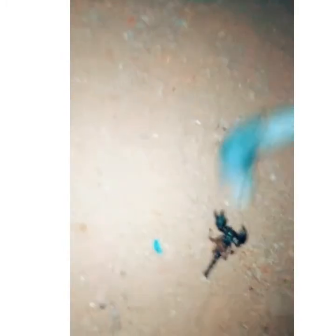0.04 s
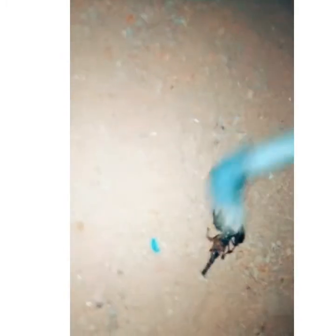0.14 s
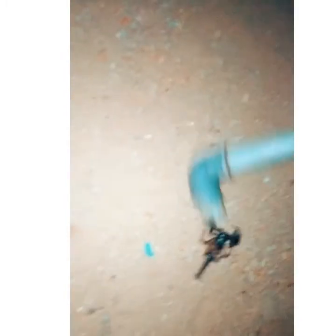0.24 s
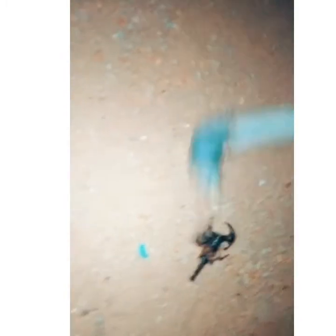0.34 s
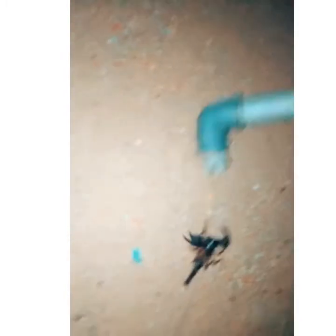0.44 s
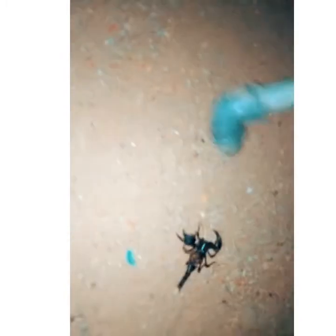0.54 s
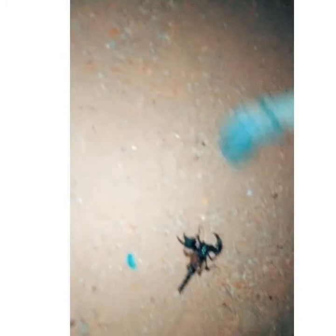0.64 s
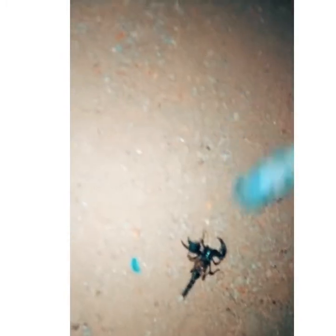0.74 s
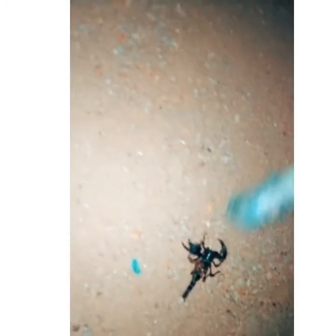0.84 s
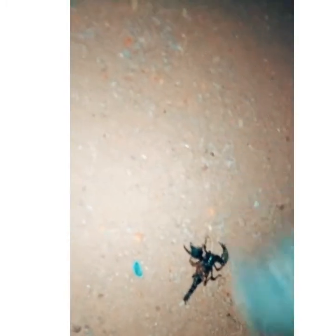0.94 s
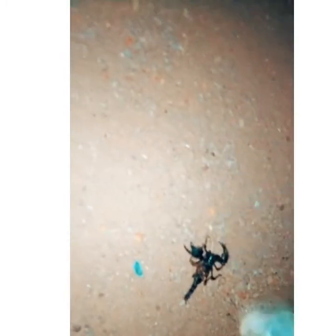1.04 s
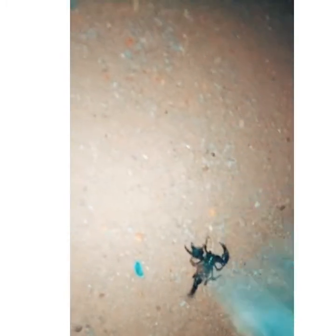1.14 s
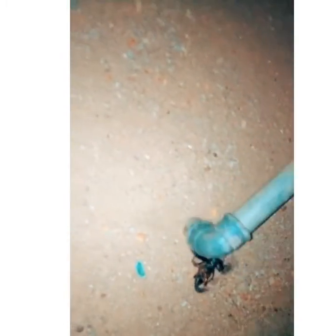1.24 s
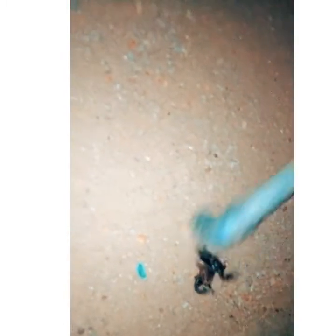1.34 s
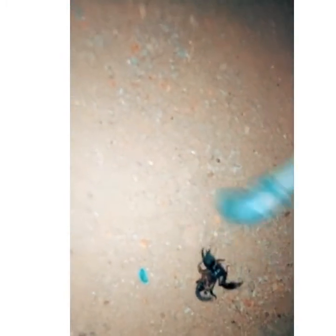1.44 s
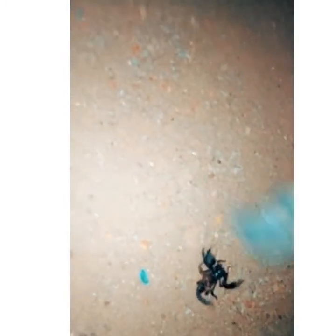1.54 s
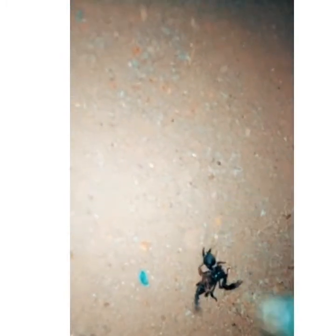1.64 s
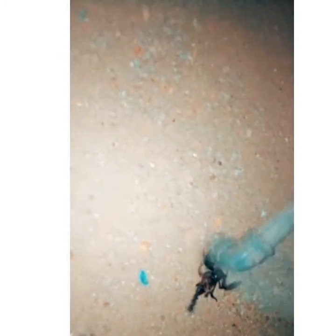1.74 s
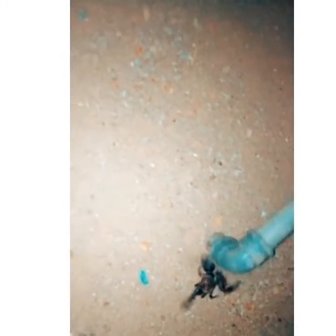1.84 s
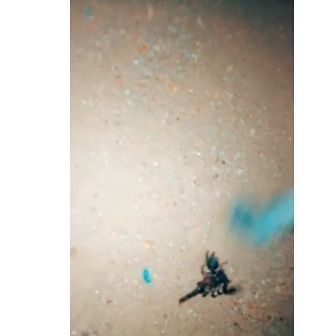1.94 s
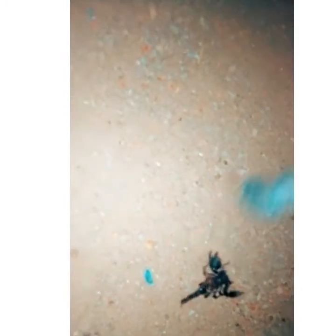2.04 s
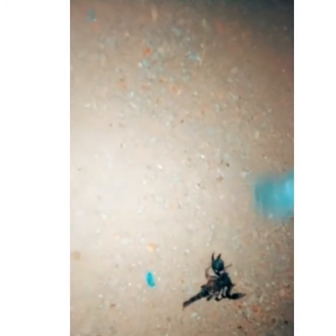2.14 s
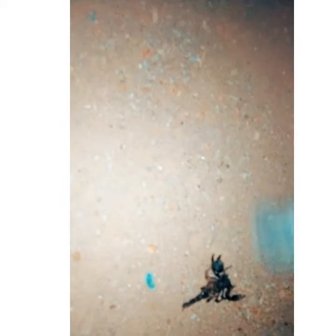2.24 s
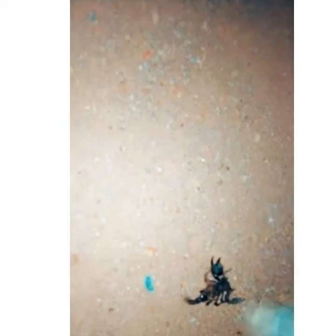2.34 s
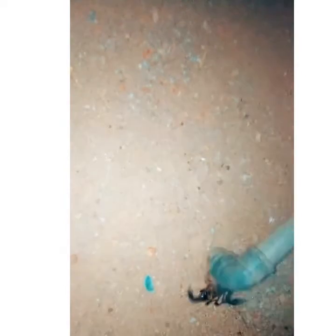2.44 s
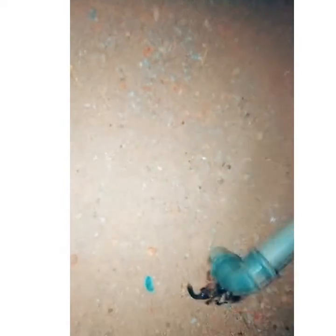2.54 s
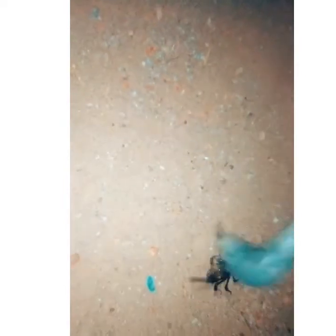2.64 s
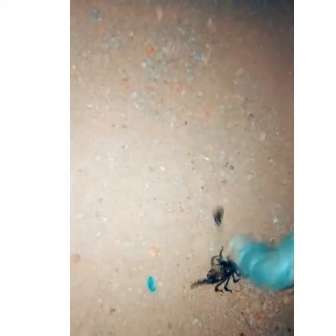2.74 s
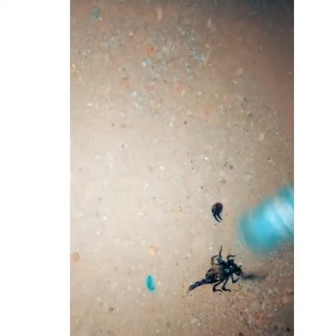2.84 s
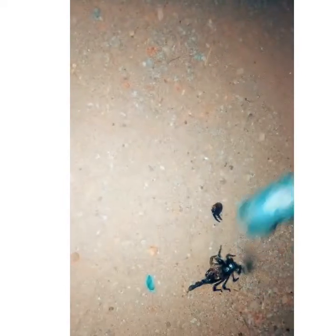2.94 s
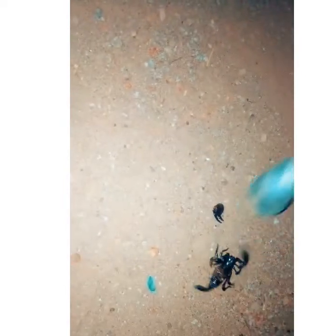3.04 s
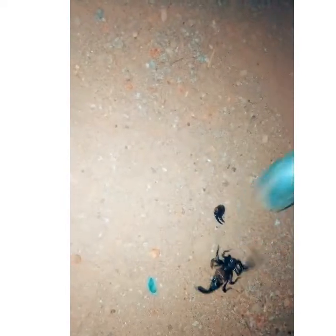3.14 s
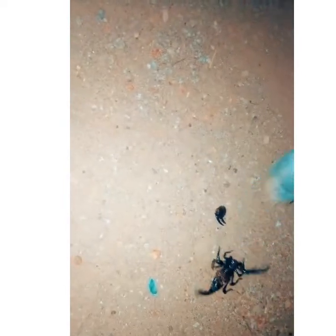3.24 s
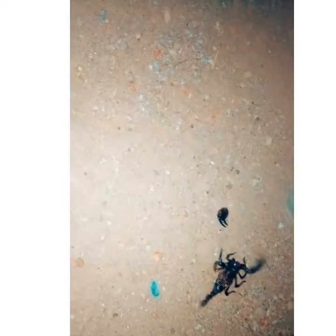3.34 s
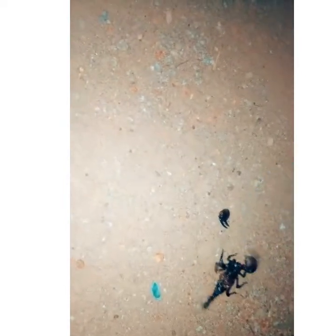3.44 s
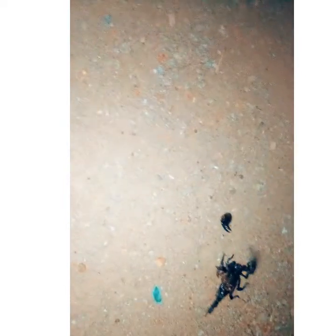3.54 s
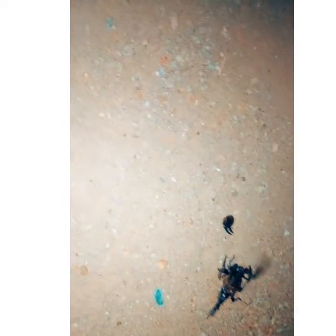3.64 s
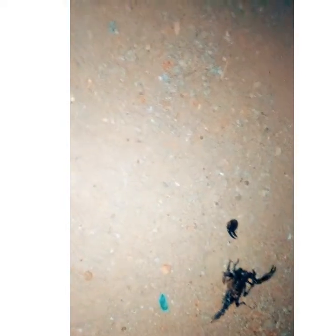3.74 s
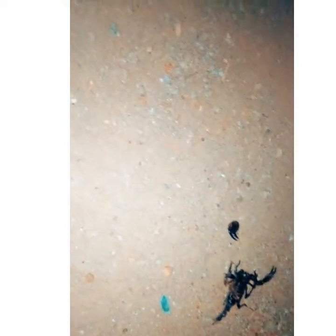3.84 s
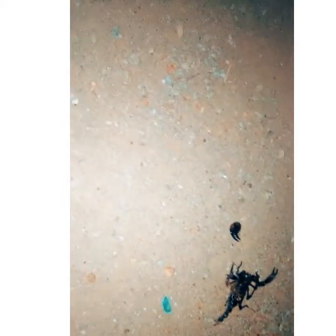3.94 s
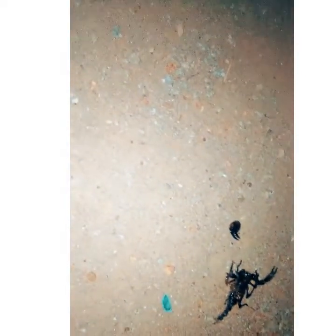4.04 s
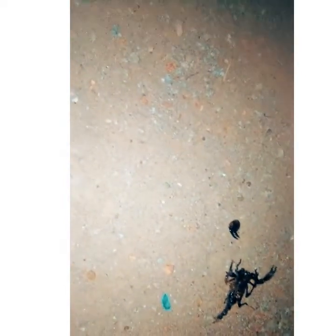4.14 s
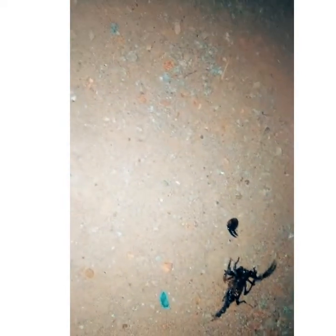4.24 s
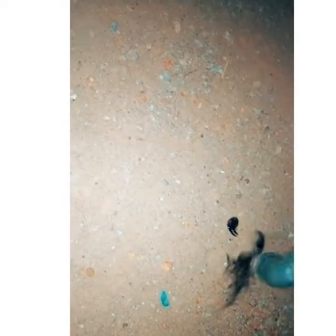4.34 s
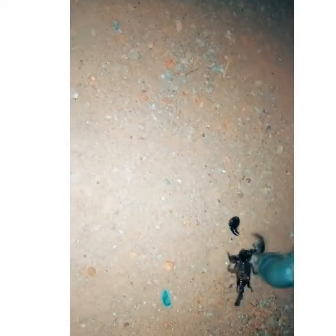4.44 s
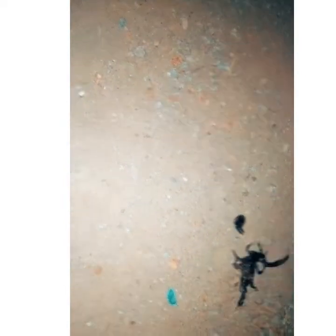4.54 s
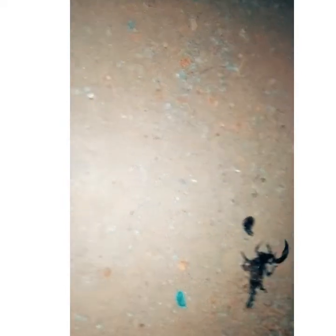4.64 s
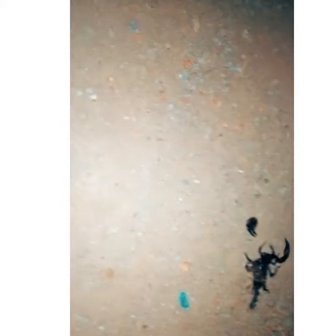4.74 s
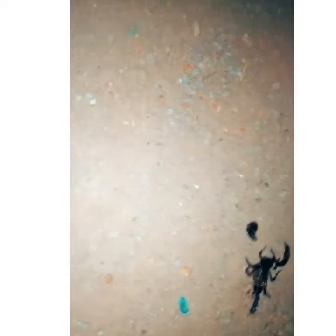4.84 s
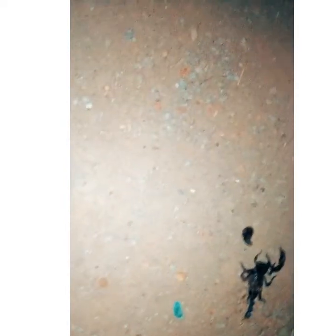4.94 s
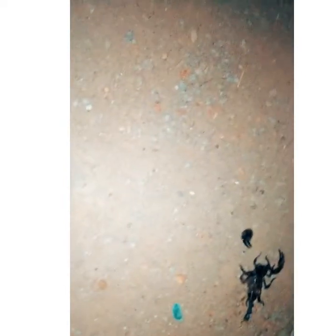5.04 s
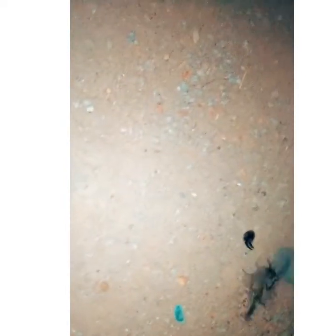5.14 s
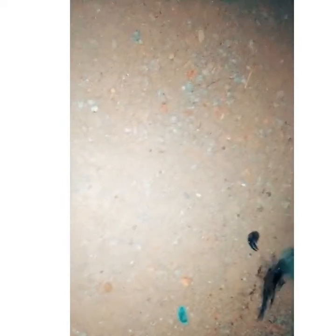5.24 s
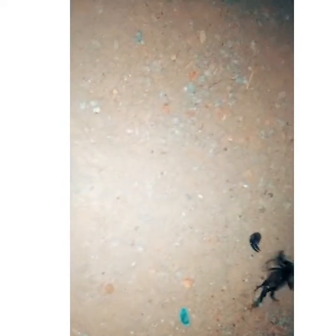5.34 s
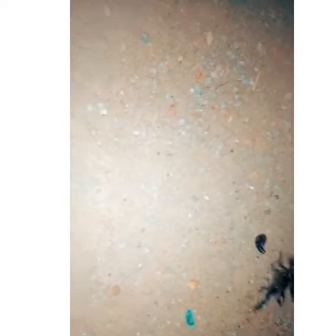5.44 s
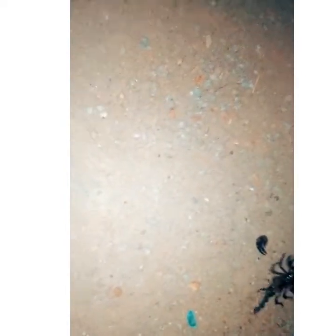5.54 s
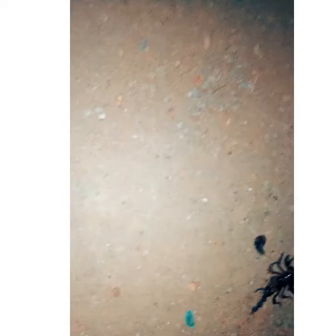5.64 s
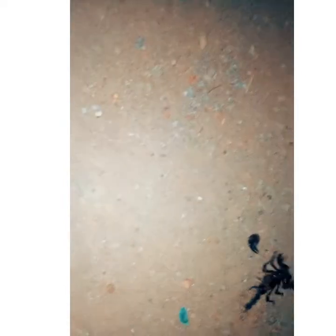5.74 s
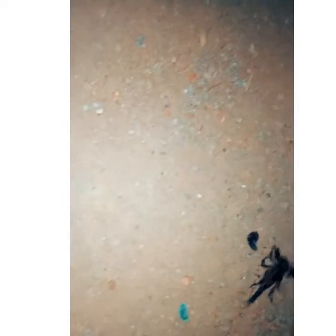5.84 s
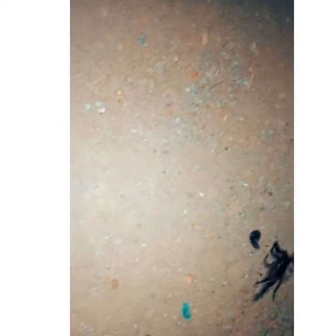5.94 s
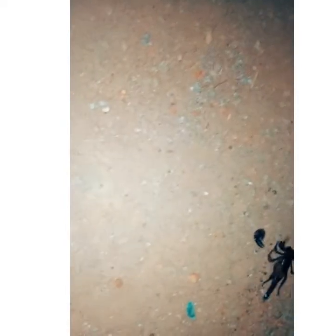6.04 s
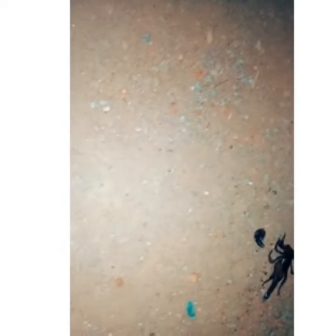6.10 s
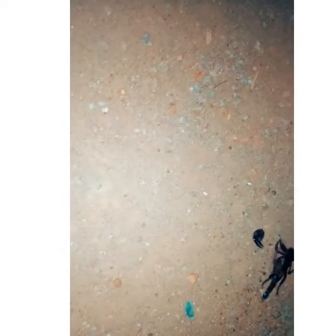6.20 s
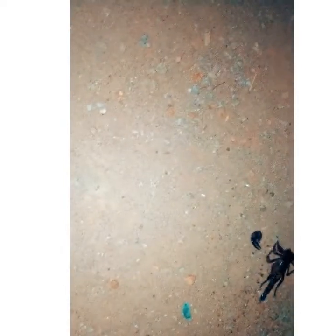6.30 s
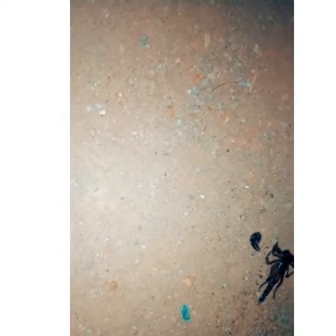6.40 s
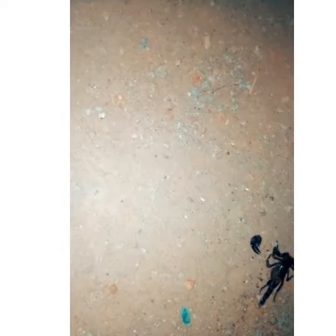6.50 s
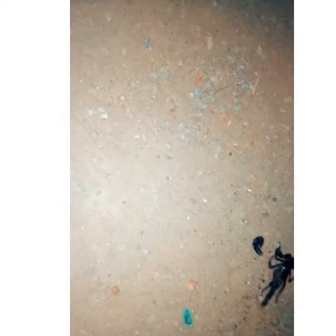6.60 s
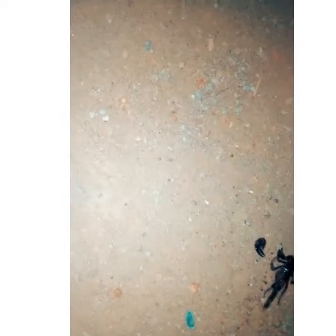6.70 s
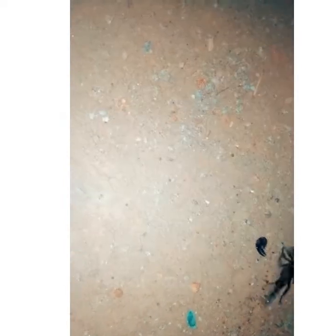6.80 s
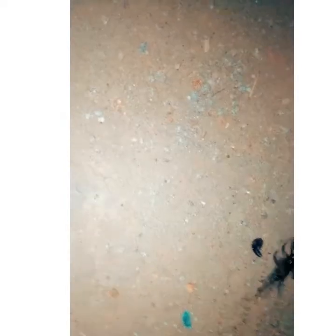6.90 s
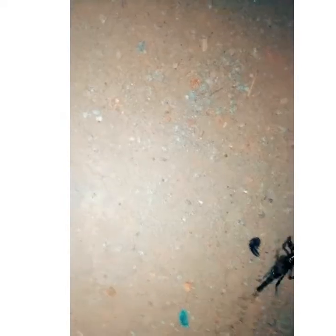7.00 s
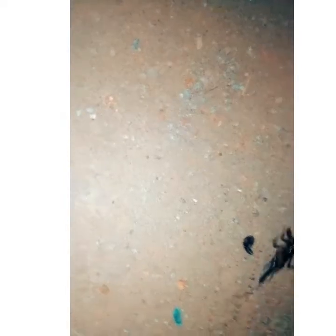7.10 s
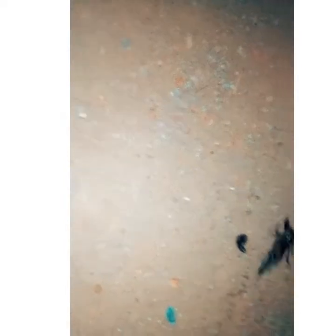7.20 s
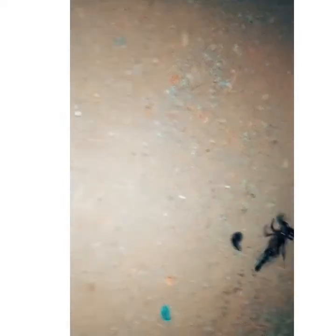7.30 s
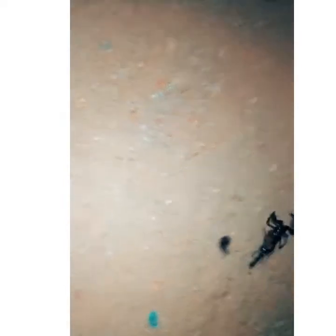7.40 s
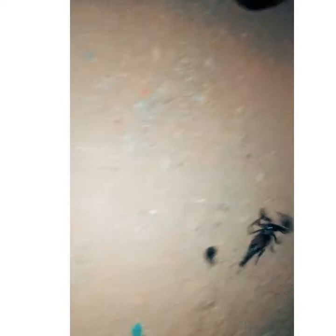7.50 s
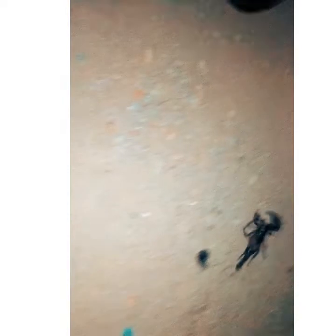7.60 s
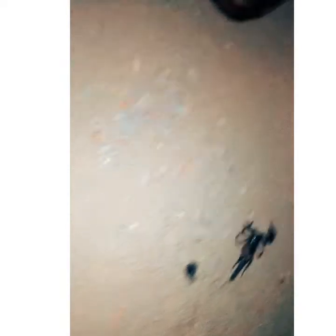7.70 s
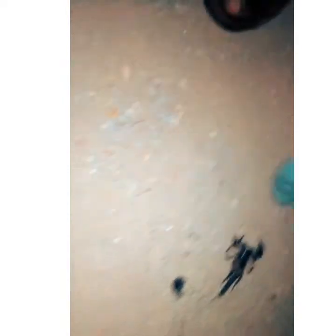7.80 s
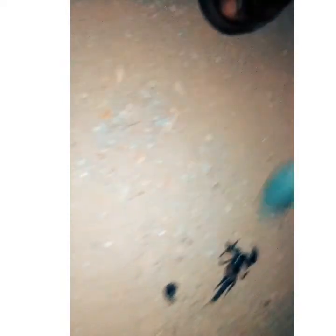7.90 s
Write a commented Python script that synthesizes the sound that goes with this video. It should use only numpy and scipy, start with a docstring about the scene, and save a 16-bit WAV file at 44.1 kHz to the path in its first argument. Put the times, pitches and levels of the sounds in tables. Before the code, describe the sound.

A plastic pipe strikes gritty ground in sharp, hollow knocks at irregular intervals, with faint crickets in the night air.

```python
"""Beating a scorpion at night

A plastic pipe with an elbow is beaten on a scorpion on hard, gritty ground. Each blow crunches
through grit, thuds and rings the air in the pipe. The elbow taps and skids, pebbles land, and
nearby walls echo. Crickets trill and chirp in the distance over the low rumble of the night air.
The hardest blows overload the microphone."""
import sys
import numpy as np
from scipy import signal
from scipy.fft import rfft, irfft, next_fast_len
from scipy.io import wavfile
from scipy.ndimage import uniform_filter1d, map_coordinates

SR = 44100
rng = np.random.default_rng(int(sys.argv[2]) if len(sys.argv) > 2 else 0)


def unload_wav(signal):
    """Save mono or channel-first audio to the path in sys.argv[1] as 16-bit WAV at rate SR, clipped to [-1, 1]."""
    wavfile.write(
        sys.argv[1],
        SR,
        np.round(np.clip(np.atleast_2d(signal).T, -1, 1) * 32767).astype(np.int16),
    )


N = 350991

# Tone of the night air and hiss: pitch_hz, gain_db (a gain is a relative level)
NIGHT_TONE = [(20, -22.5), (45, -10), (80, 0), (160, -3), (300, -9), (1000, -15.5), (3000, -20),
              (7000, -21.5), (7900, -32.5), (13800, -34), (15000, -27), (15500, -19.5), (15900, -47)]
# Far trilling insects: pitch_hz, width_hz, level_db, swell_db
TRILLS = [(2510, 150, -85, 2), (4250, 300, -82.5, 3), (5740, 240, -72, 2), (5990, 260, -64, 1.44),
          (6584, 560, -72, 2), (7120, 320, -78.5, 3)]
# The nearer cricket's loud calls: middle_s, level_db
LOUD_CHIRPS = [(1.67, -64), (2.0, -63.5), (2.275, -58), (2.885, -57.5), (4.31, -61.5), (4.63, -60),
               (6.53, -63.5), (6.88, -60), (7.26, -61.5)]

# Echoes off the ground and near wall: pitch_hz, fade_s (the time to die away by 60 dB)
NEAR_FADES = [(100, 0.11), (400, 0.075), (1500, 0.092), (6000, .1), (12000, 0.03)]
# Their tone: pitch_hz, gain_db
NEAR_TONE = [(100, 1), (400, 5), (900, 0), (2000, 4.5), (6000, 0), (12000, 11)]
# Echoes from the yard: pitch_hz, fade_s
YARD_FADES = [(100, .55), (280, .28), (420, .55), (650, .28), (1500, 0.23), (6000, .38), (12000, 0.14)]
# Their tone: pitch_hz, gain_db
YARD_TONE = [(100, 4.5), (250, -4.5), (420, -2), (700, 2.5), (2500, 1), (6000, -4.5), (12000, 2)]

# Tone of a pebble's tick: pitch_hz, gain_db
PEBBLE_TONE = [(300, -50), (1500, -30), (2500, -11), (3500, -12), (5000, -1), (6400, 9.5), (7300, -9),
               (9000, -42), (16000, -53)]
# Loose sand under a light touch: pitch_hz, gain_db
SAND_TONE = [(200, -45), (900, -7), (1400, -6.5), (2000, -14), (2600, -7), (3700, -6), (4800, 0),
             (5500, 1.5), (6400, 6), (7300, -8.5), (8500, -20), (10000, -31.5), (15000, -40),
             (16500, -50.5)]
# A full blow's gritty crack, with the high fizz of an overloaded microphone: pitch_hz, gain_db
CRACK_TONE = [(40, -40), (150, -25), (600, -7.5), (1400, -2.5), (2000, -10), (2500, -6.5), (3200, -2.5),
              (3900, -3), (4700, 0.5), (5400, -0.5), (6300, 8), (7200, -7.5), (8500, -16.5), (13000, -32),
              (15200, -21), (16500, -32)]
# The pipe knocking on the ground: pitch_hz, gain_db, fade_s
PIPE_NOTES = [(236, -12.5, .04), (317.2, -3.5, 0.03), (407, -1.5, 0.023), (760, -14, 0.011),
              (886, -13.5, 0.048), (1277.5, -9.5, .03), (1433.5, -13.5, 0.022), (1830, -18.5, 0.029),
              (2220, -24, 0.043)]
# The elbow's rim: pitch_hz, gain_db, fade_s
RIM_NOTES = [(1820, -7.5, .02), (2276, -1, 0.03), (2596, 7.5, 0.019), (3070, -5, 0.023)]
# The elbow landing on its side: pitch_hz, gain_db, fade_s
SIDE_NOTES = [(547.4, -10.5, 0.058), (685, -0.5, 0.032)]
# The dull thump of packed earth: pitch_hz, gain_db, fade_s
EARTH_NOTES = [(83.5, -29.5, 0.31), (122, -17.5, 0.04)]
# The air in the pipe, lowest note first: gain_db, fade_s
AIR_NOTES = [(-1, .19), (0.5, 0.14), (-7, 0.048), (-15.5, 0.064)]

# Flung pebbles land: start_s, level_db
PEBBLE_LANDINGS = [(0.029, -44.5), (1.336, -31), (1.9363, -19.5), (2.7, -46)]
# The elbow drags over grit: start_s, length_s, level_db
SKIDS = [(.22, 0.064, -46), (1.283, 0.056, -46.5), (1.854, 0.046, -41.5), (2.554, 0.066, -47.5),
         (4.43, 0.055, -48), (5.236, .03, -37.5), (6.784, 0.0179, -38.5)]
# Light taps and bounces: start_s, click_db, thud_db, rim_db
TAPS = [(0.203, -30.5, -72, -31), (.246, -41, -67, -42.5), (.29, -33, -72, -38.5),
        (1.247, -29.5, -59.5, -47), (1.323, -29, -30.5, -48), (1.8553, -42, -29.5, -56),
        (2.574, -29, -46, -72), (4.443, -24.5, -51, -60), (4.463, -25.5, -40, -45), (5.239, -31, -19, -48),
        (5.311, -38.5, -56.5, -51), (6.776, -36, -58.5, -48.5), (6.799, -42, -50, -38)]
# Blows, each touching the grit lead_s before it lands:
# start_s, lead_s, thud_db, tilt_db_per_octave, side_db, crack_db, earth_db, air_hz, air_db
BLOWS = [(1.1906, .0025, -3.5, -1.5, -24, -11, -26, 461.6, -23),
         (1.7641, .0031, -8, -2, -23, -9.5, -11, 426, -26),
         (2.454, .0026, -15, -1, -18.5, -6.5, -10, 423, -34),
         (4.3602, .0075, -5.5, 1.5, -21, -9, -8, 416.3, -38),
         (5.1644, .0046, 0, 1.37, -10.5, -8, -10, 420, -28),
         (6.797, .008, -35, 15, -37, -27, -31, 466.4, -40)]

T = np.arange(SR // 2) / SR  # half a second of time for one short sound


def amp(db):
    """Turn decibels into a multiplier."""
    return 10 ** (np.asarray(db) / 20)


def unit(x):
    """Scale a sound to an average power of 1."""
    return x / np.sqrt(np.mean(x ** 2) + 1e-20)


def along(points, hz):
    """Read between the rows of a (pitch, value) table."""
    pitches, values = np.transpose(points)
    return np.interp(np.log(hz + 1), np.log(pitches), values)


def fade(fade_s, t=T):
    """Start at t = 0 and die away by 60 dB in fade_s."""
    return (t >= 0) * amp(-60 * np.abs(t) / max(fade_s, .002))


def rise(rise_s):
    """Climb smoothly from 0 to 1."""
    return 1 - np.exp(-T / rise_s)


def add(track, start_s, x):
    """Mix a sound into the track."""
    part = track[max(round(start_s * SR), 0):][:len(x)]
    part += x[:len(part)]


def wobble(rate_hz):
    """A smooth curve through rate_hz random points a second."""
    points = rng.standard_normal(int(N * rate_hz / SR) + 4)
    return map_coordinates(points, [np.arange(N) * rate_hz / SR])


def filtered(x, gain_at):
    """Turn each pitch up or down by gain_at(hz)."""
    size = next_fast_len(N + SR // 2)
    return irfft(rfft(x, size) * gain_at(np.fft.rfftfreq(size, 1 / SR)), size)[:N]


def band(hz, width_hz):
    """A narrow hiss around one pitch."""
    return unit(filtered(rng.standard_normal(N), lambda f: np.exp(-2 * ((f - hz) / width_hz) ** 2)))


def night(level_db=-64.5):
    """The night air rumbles steadily over a faint hiss."""
    return amp(level_db) * unit(filtered(rng.standard_normal(N), lambda hz: amp(along(NIGHT_TONE, hz))))


def far_insects(flutter_db=.15, pulse_db=-88.5, first_pulse_s=.06, pulse_every_s=.187):
    """Many far insects blur into a fluttering trill, and a high one pulses above them."""
    trill = sum(amp(db + swell_db * wobble(12) + flutter_db * wobble(76)) * band(hz, width_hz)
                for hz, width_hz, db, swell_db in TRILLS)
    pulses = np.cos(np.pi * (np.arange(N) / SR - first_pulse_s) / pulse_every_s) ** 2
    return trill + amp(pulse_db) * pulses * band(8600, width_hz=800)


def cricket(pitch_hz=4237, scatter_hz=32, waver_hz=30, first_s=1.37, every_s=.323,
            soft_db=-68.5, half_chirp_s=.03, stroke_db=2.5, echo_db=-2):
    """A nearer cricket chirps with uneven wing strokes; a loud call replaces a soft one."""
    beats = np.arange(first_s, N / SR, every_s)
    levels = soft_db + 2 * rng.standard_normal(len(beats))
    soft_chirps = [(s, db) for s, db in zip(beats, levels)
                   if all(abs(s - loud_s) > every_s / 2 for loud_s, _ in LOUD_CHIRPS)]
    chirps = np.zeros(N)
    t = T - T.mean()
    for middle_s, db in LOUD_CHIRPS + soft_chirps:
        waver = waver_hz * unit(uniform_filter1d(rng.standard_normal(len(T)), size=200))
        hz = pitch_hz + scatter_hz * rng.normal() + waver
        wings = np.sin(2 * np.pi * np.cumsum(hz) / SR)
        add(chirps, middle_s + t[0], amp(db) * wings / (1 + np.abs(t / half_chirp_s) ** 3))
    chirps *= amp(stroke_db * wobble(64))
    # distance gives each chirp a ragged trail of echoes
    trail = rng.standard_normal(len(T)) * fade(.53)
    return chirps + amp(echo_db) * signal.fftconvolve(chirps, trail / np.linalg.norm(trail))[:N]


def echoes(fades, tone, build_s):
    """A blur of echoes builds up, then each pitch fades at its own speed."""
    hz, t, noise = signal.stft(rng.standard_normal(len(T)), SR, nperseg=256)
    gain_db = along(tone, hz)[:, None] - 60 * t / along(fades, hz)[:, None]
    tail = signal.istft(noise * amp(gain_db), SR, nperseg=256)[1][:len(T)]
    tail *= 1 - np.exp(-(T / build_s) ** 2)
    return tail / np.linalg.norm(tail)


def in_yard(x, near_db=-7, yard_db=-17):
    """A sound bounces quickly off the ground and near wall, and faintly around the yard."""
    paths = amp(near_db) * echoes(NEAR_FADES, NEAR_TONE, build_s=.0024)
    paths += amp(yard_db) * echoes(YARD_FADES, YARD_TONE, build_s=.0068)
    paths[0] += 1  # the sound that comes straight to the ear
    return signal.fftconvolve(x, paths)


def grain(tone):
    """One grain cracks: a tiny click with the given tone."""
    shape = irfft(np.log(amp(along(tone, np.fft.rfftfreq(len(T), 1 / SR)))))
    # folding the late half onto the early half gives the click a sharp start
    shape[1:len(T) // 2] *= 2
    shape[len(T) // 2:] = 0
    click = irfft(np.exp(rfft(shape)))
    return click / np.linalg.norm(click)


def crunch(pressure, tone, spread_db):
    """Grains of uneven size crack, louder the harder they are pressed."""
    sizes = amp(spread_db * np.clip(rng.standard_normal(len(T)), -2, 2))
    cracks = unit(rng.standard_normal(len(T)) * sizes) * pressure
    return signal.fftconvolve(cracks, grain(tone))[:len(T)]


def ring(notes, tilt=0, scatter_db=1.87, rise_s=.00047):
    """A struck thing rings a little differently each time; tilt (dB per octave) favours high notes."""
    sound = np.zeros(len(T))
    for k, (hz, db, fade_s) in enumerate(notes):
        strength = amp(db + tilt * np.log2(hz / 880) + scatter_db * rng.normal())
        sound += (-1) ** k * strength * fade(fade_s) * np.sin(2 * np.pi * hz * T)
    return sound * rise(rise_s)


def thud(tilt, bass_cut_hz=110):
    """The pipe knocks; so small a body gives off little bass."""
    bass_cut = signal.butter(1, bass_cut_hz, "high", fs=SR, output="sos")
    return signal.sosfilt(bass_cut, ring(PIPE_NOTES, tilt))


def pipe_air(hz, base_db, overtone_db):
    """The air in the pipe rings at multiples of a pitch set by how far the ground covers the mouth."""
    return sum(amp(db + (overtone_db if k else base_db)) * fade(fade_s)
               * np.sin(2 * np.pi * (k + 1) * hz * T) for k, (db, fade_s) in enumerate(AIR_NOTES))


def pebbles():
    """Each pebble thrown up by the pipe lands with one thin, bright tick."""
    track = np.zeros(N)
    for start_s, db in PEBBLE_LANDINGS:
        tick = crunch(fade(.014) * rise(.00019), PEBBLE_TONE, spread_db=3.5)
        add(track, start_s, amp(db) * in_yard(tick))
    return track


def skids(catches_per_s=250, trickle_db=-14, pipe_db=-9):
    """The rim catches on grain after grain, jolting the pipe, and loosened sand trickles on."""
    track = np.zeros(N)
    for start_s, length_s, db in SKIDS:
        stroke = np.clip(3 * np.sin(np.pi * np.minimum(T / length_s, 1)), 0, 1)
        trickle = amp(trickle_db) * fade(.47, T - length_s)
        catches = (rng.random(len(T)) < catches_per_s / SR) * rng.uniform(.14, 1, len(T))
        drag = unit(signal.fftconvolve(catches, fade(.0084))[:len(T)] + .36)
        pressure = drag * (stroke + trickle)
        knock = thud(tilt=7)
        shaking = pressure * rng.standard_normal(len(T))
        jolts = signal.fftconvolve(shaking, knock / np.linalg.norm(knock))[:len(T)]
        scrape = crunch(pressure, SAND_TONE, spread_db=4)
        add(track, start_s, amp(db) * in_yard(scrape + amp(pipe_db) * jolts))
    return track


def taps():
    """Light touches click and ring the rim, with little weight behind them."""
    track = np.zeros(N)
    for start_s, click_db, thud_db, rim_db in TAPS:
        click = crunch(amp(click_db) * fade(.023) * rise(.0003), SAND_TONE, spread_db=1)
        pipe = amp(thud_db) * thud(tilt=-1.5) + amp(rim_db) * ring(RIM_NOTES)
        add(track, start_s, in_yard(click + pipe))
    return track


def blows(touch_fade_s=.04, snap_fade_s=.0058, crumble_fade_s=.025):
    """The elbow touches the grit, then lands fully: a snap, crumbling grit and a hollow knock."""
    track = np.zeros(N)
    for start_s, lead_s, thud_db, tilt, side_db, crack_db, earth_db, air_hz, air_db in BLOWS:
        tone = CRACK_TONE if crack_db > -20 else SAND_TONE  # a gentle blow only shifts the sand
        touch = crunch(amp(crack_db - 7.5) * fade(touch_fade_s), tone, spread_db=3)
        pressure = (fade(snap_fade_s) + fade(crumble_fade_s)) * rise(.00076)
        crack = crunch(amp(crack_db) * pressure, tone, spread_db=2.5)
        air = pipe_air(air_hz, air_db, overtone_db=-23.5 + .36 * thud_db)
        pipe = amp(thud_db) * thud(tilt) + amp(side_db) * ring(SIDE_NOTES)
        earth = amp(earth_db) * ring(EARTH_NOTES, rise_s=.0047)
        rim = amp(crack_db - 22) * ring(RIM_NOTES)
        add(track, start_s - lead_s, in_yard(touch))
        add(track, start_s, in_yard(crack + air + pipe + earth + rim))
    return track


def scene():
    """The beating pipe in front of the insects and the night air."""
    return (blows() + taps() + skids() + pebbles() + far_insects() + cricket() + night())[None]


def record(dry, top_hz=15900):
    """The loudest peaks are squashed, and the highest treble is cut off."""
    squashed = dry[0] / (1 + np.abs(dry[0]) ** 6) ** (1 / 6)
    return filtered(squashed, lambda hz: hz < top_hz)[None]


dry = scene()
out = record(dry)
unload_wav(out)
```